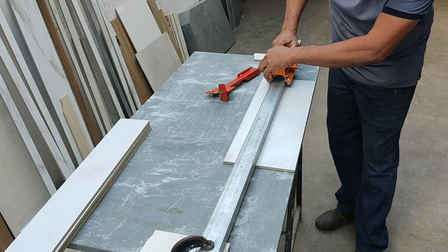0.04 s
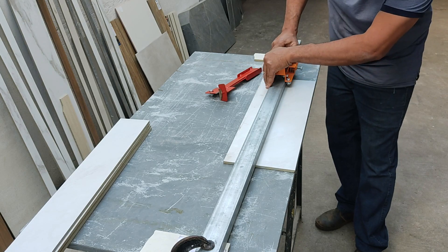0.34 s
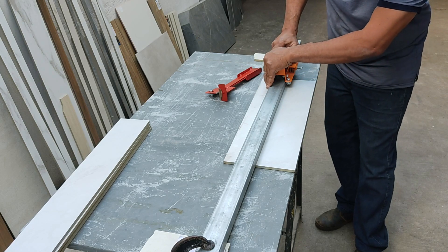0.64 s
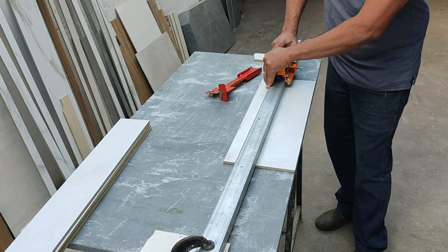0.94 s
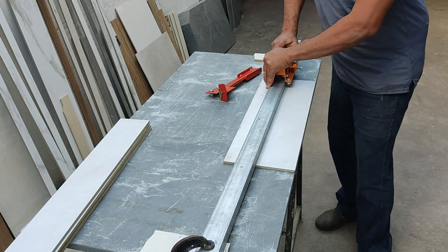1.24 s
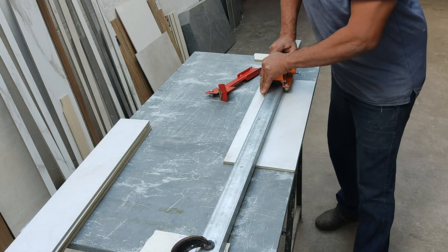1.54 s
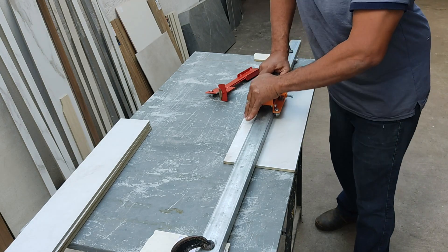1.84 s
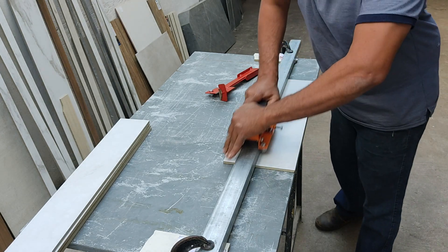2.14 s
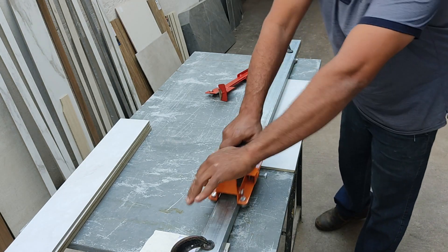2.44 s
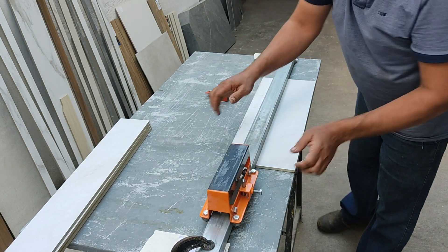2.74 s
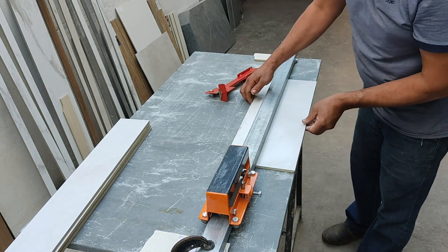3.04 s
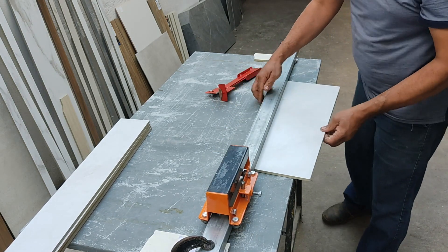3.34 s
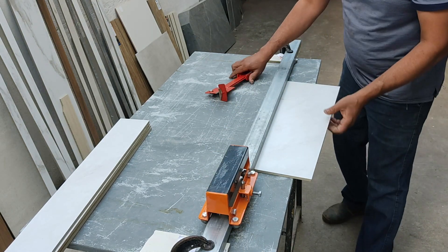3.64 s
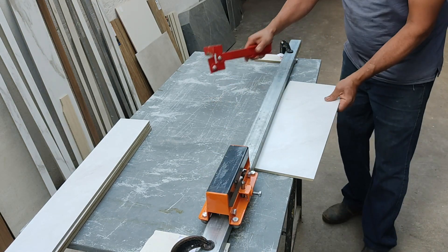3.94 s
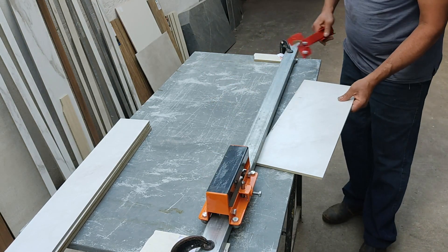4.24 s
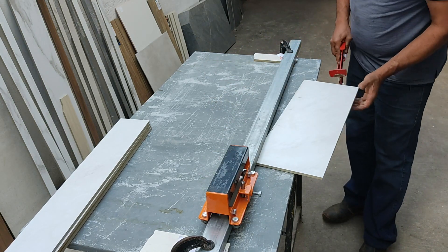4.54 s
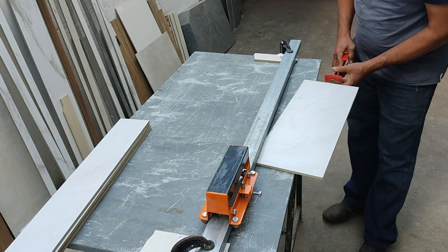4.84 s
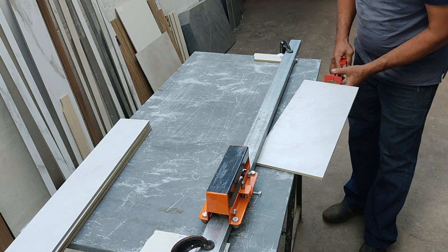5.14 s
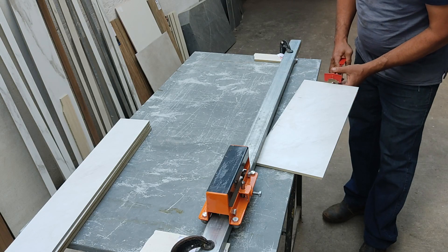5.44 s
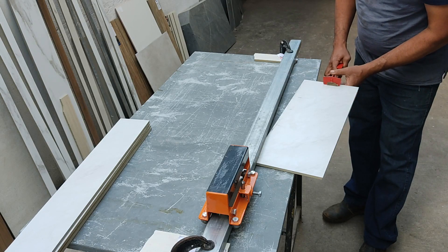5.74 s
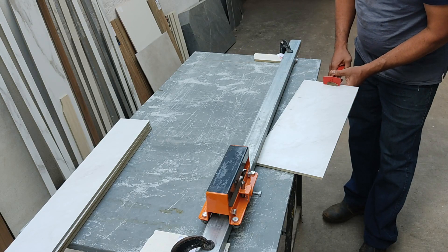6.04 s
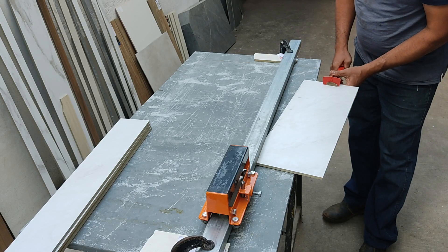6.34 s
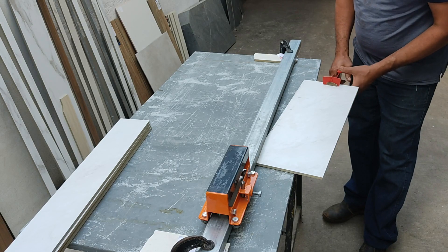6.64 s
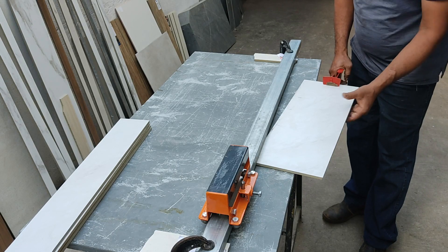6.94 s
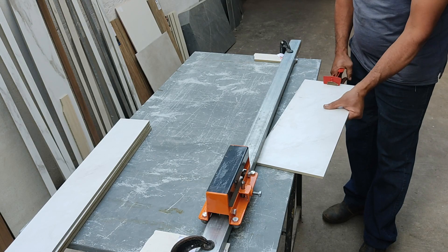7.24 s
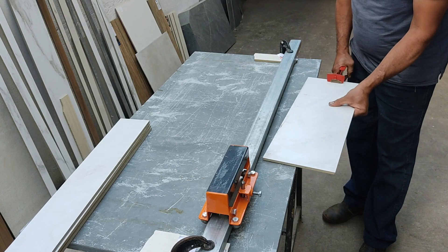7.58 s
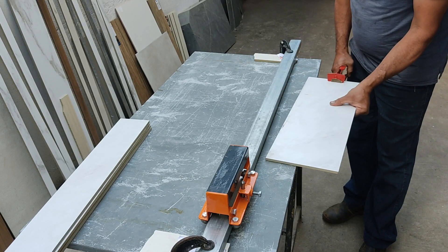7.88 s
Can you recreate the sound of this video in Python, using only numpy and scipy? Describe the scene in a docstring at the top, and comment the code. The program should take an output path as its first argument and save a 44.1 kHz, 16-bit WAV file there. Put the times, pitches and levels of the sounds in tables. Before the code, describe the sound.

A faint, steady rumble and hiss fill a hard-walled workshop, with a barely audible scuff at first. At about 1.4 seconds a cutter's wheel bites into a porcelain tile and scores it in one loud, gritty, high scrape, with crackling chips and brief steel squeals over the carriage rumbling along its rail. At 2.4 the wheel drops off the edge with a sharp knock and the carriage rolls to rest. The tile rubs on the steel bench from 3.1 to 3.6 and again around 4, among light clacks. Pliers jingle softly at 4.8, bite with a hard click at 5.4, and the tile cracks with a ping at 5.7. At 6.6 a strip snaps off with a loud crack and slight thud. Lighter knocks follow until 7.3, then the tile drags briefly until 7.8. Everything sounds fairly close, with a short room echo.

```python
"""In a hard-walled workshop, a porcelain tile is cut on a steel bench.
A carriage rumbles along its rail while its wheel crushes a line into the glaze and the steel sings.
The tile rubs on the bench as it is slid out and turned. Pliers jingle and bite, a strip snaps off,
and the pieces knock and drag. The walls echo the work over a faint, steady rumble and hiss."""
import sys
import numpy as np
from scipy import signal
from scipy.fft import rfft, irfft
from scipy.io import wavfile
from scipy.ndimage import uniform_filter1d

SR = 44100
rng = np.random.default_rng(int(sys.argv[2]) if len(sys.argv) > 2 else 0)


def unload_audio(sound):
    """Save the sound as a 16-bit wav file, at the path given as the first command line argument."""
    columns = np.transpose(np.atleast_2d(sound))
    # keep every value between -1 and 1, then stretch to whole-number steps
    steps = np.round(np.clip(columns, -1, 1) * 32767)
    wavfile.write(sys.argv[1], SR, steps.astype(np.int16))


N = 353241
TIME = np.arange(N) / SR

# Tone colour (how strong each pitch is) of crushed glaze: f/Hz, level/dB
GLAZE_COLOUR = [(2240, -30), (3300, -15), (4300, -19), (5000, -15), (5600, -7), (6500, -3), (7470, 0),
                (8300, -2), (9130, -9), (10000, -21), (13100, -21), (15500, -31)]
# Tone colour of the tile ringing under the wheel: f/Hz, level/dB
PLATE_COLOUR = [(530, -30), (900, -14), (1300, -10), (1700, -2), (2050, 3), (2550, 2.5), (2900, 1),
                (3500, -6), (4300, -14), (5850, -30), (9900, -80)]
# Pitches at which the steel wheel and its holder ring: f/Hz, width/Hz, level/dB
HOLDER_RINGS = [(6430, 47, -4), (7080, 60, -4), (7410, 70, -1), (7680, 54, 0), (8180, 78, -2),
                (8670, 27, -9), (8840, 51, -6), (9260, 34, -12)]
# Large chips break out: t/s, boost/dB
BIG_CHIPS = [(1.512, 2.1), (2.036, 9.6), (2.199, 8.7)]
# The wheel catches and squeals: t/s, rise/s, fall/s, f/Hz, level/dB
SQUEALS = [(1.43, .085, .12, 7400, -18.5), (1.51, 0.06, 0.054, 6340, -25.5), (1.64, .04, 0.055, 7370, -28),
           (2.05, .025, .03, 8190, -27.5), (2.16, .008, .014, 7700, -19.5), (2.194, .008, .02, 7380, -14.5),
           (2.228, .006, .012, 7350, -18)]
# The carriage's run along the rail: t/s, relative speed
CARRIAGE_SPEED = [(1.41, 0.079), (1.55, 0.19), (1.68, 0.47), (1.88, 0.88), (2.37, 0.89), (2.46, 0.56),
                  (2.69, 0.19), (2.77, 0.064), (3.0, 0.0049)]
# Rumble of rail and bench: f/Hz, level/dB
RAIL_COLOUR = [(59, -41.5), (110, -32.5), (155, -14.5), (198, -1.5), (279, -3.5), (308, -4.5), (406, 0),
               (560, -2.5), (630, 0), (722, 0.5), (833, -6.5), (962, -4.5), (1280, -12.5), (1400, -2.5),
               (1820, -43), (3080, -120)]
# Hiss of the bearings: f/Hz, level/dB
BEARING_COLOUR = [(710, -30), (1200, -9), (1800, -2), (2500, -1), (3600, -11), (4800, -15), (6300, -9),
                  (8200, -7), (9200, -16), (10000, -36), (14000, -36)]
# Knocks, clicks and snaps: t/s, body level/dB, crack over body/dB, splinter over body/dB, ring/s
KNOCKS = [(1.348, -57, 20, 26.5, 0.07), (1.412, -62, 24.5, 31, 0.032), (2.376, -21, 1, -36, 0.048),
          (2.715, -47.5, 2, 7, 0.068), (3.004, -68, -5, 10.5, 0.98), (3.773, -40, -9, -13.5, 0.06),
          (3.789, -49.5, -3, -4.5, 0.12), (3.907, -31.5, -9.5, -5, 0.026), (4.353, -34, -2.5, -19, 0.28),
          (4.375, -40, 1.5, 2.5, 0.2), (4.431, -43, -9.5, -14, 0.05), (4.797, -68, 8, 17, 0.2),
          (4.814, -68.5, 17.5, 24.5, 0.2), (5.426, -24, 1, -12.5, 0.14), (5.445, -35.5, -10, -2, 0.06),
          (5.701, -34, 7, 6, 0.19), (5.783, -36, -26, -16, 0.044), (6.447, -48, -11, -8, 0.28),
          (6.6, -39.5, -4, -17, 0.054), (6.61, -31, -28, -18, 0.062), (6.629, -22.5, 2, -0.5, 0.12),
          (6.642, -29, -11, -10, 0.077), (6.654, -38, -1, -8, 0.17), (6.797, -37.5, -0.5, -23, 0.26),
          (7.06, -39, 1, 1.5, 0.17), (7.146, -39, -0.5, -3, 0.11), (7.282, -47, -10, -5, 0.12)]
# Tone colour of a hard blow: f/Hz, level/dB
BLOW_COLOUR = [(29, -51), (50, -21), (120, -19), (180, 2), (235, -1), (300, -3), (380, 1), (480, -2),
               (680, -2), (980, -1), (1350, -7), (2820, -6), (3500, -13), (6060, -16), (7510, -8),
               (9310, -19), (10500, -44), (15000, -56)]
# Bright rings of struck porcelain: f/Hz, width/Hz, level/dB
PORCELAIN_RINGS = [(635, 60, -4), (990, 110, 2), (1280, 50, -2), (1600, 180, 0), (2050, 90, 5),
                   (2240, 100, 5), (2700, 160, 2)]
# Notes of the tile lying on the bench: f/Hz, level/dB, ring before damping/s
TILE_NOTES = [(199, -2, 0.61), (350, -2, 0.48), (484, -2, 0.37), (894, -8, 0.3), (1020, -1, 0.38),
              (1179, -1, 0.47), (1287, -2, 0.3), (1663, -6, 0.48), (1906, -7, 0.66)]
# Notes of the pliers' loose jaws: f/Hz, level/dB, ring before it is capped/s
JAW_NOTES = [(2250, -6, 0.43), (2540, -30, 0.296), (3130, 1, .12), (3740, 6.5, 0.42), (4400, -18, 0.34),
             (5200, -14, 0.28), (5650, -7, 0.28), (6550, 3, .25), (6840, -5, 0.32), (7634, 6.5, .3),
             (8100, 5, .27), (8440, -7, .2)]
# The jaws fall open and touch: t/s, level/dB
JINGLES = [(4.796, -47.5), (4.814, -45), (4.829, -48.5)]
# Notes of the narrow strip: f/Hz, level/dB, ring before it is capped/s
STRIP_NOTES = [(2204, 1.5, 0.092), (2700, 2.5, 0.17), (2850, 1, 0.12), (3180, 0, 0.06), (4430, -6, .1),
               (4920, -18, 0.1), (6450, -9.5, 0.13), (7260, -15, 0.092), (8010, -3, .14), (8963, -13, .09)]
# The carriage scuffs the tile; then the tile is pulled out, swung round, seated and dragged away:
# t/s, rise/s, hold/s, fall/s, level/dB, then relative drone/dB, grit/dB, ring/dB
SLIDES = [(0.26, 0.017, 0.13, 0.12, -69.5, 4, 8, -21), (0.48, 0.13, 0.06, 0.13, -70, 9.5, 0, -31),
          (3.1, 0.23, 0.057, 0.18, -28.5, -12, -5.5, -5), (3.92, 0.046, 0.02, 0.042, -43.5, -8, -10, -17),
          (3.968, 0.15, 0.0079, 0.21, -28.5, -11.5, -6.5, -5.5),
          (5.131, 0.095, 0.11, 0.12, -74.5, 14.5, -15, -26),
          (6.14, 0.071, 0.18, 0.28, -64.5, -4.5, -10.5, -11),
          (7.28, 0.0042, 0.018, 0.055, -43.5, -10, -4, 2), (7.29, 0.12, 0.28, 0.091, -41, -1, -9, -0.5)]
# Tone colour of porcelain rubbing on the bench: f/Hz, level/dB
RUB_COLOUR = [(65, -55), (110, -24), (170, -7), (350, -6), (520, -7.5), (700, -4.5), (1100, -3),
              (1550, -2.5), (2200, -3), (2900, -6), (4300, -14), (6000, -13), (7800, -8.5), (9300, -18),
              (10500, -32), (15000, -44)]
# Rings of the bench and the dragged tile: f/Hz, width/Hz, level/dB
RUB_RINGS = [(362, 40, 0), (620, 90, -5), (950, 50, -2), (1060, 70, -1), (1490, 140, -4), (2170, 130, 0),
             (2740, 180, -5)]
# The heaviest blows shake the bench: t/s, level/dB
THUMPS = [(2.376, -53), (6.63, -50)]
# Tone colour of the still air: f/Hz, level/dB
AIR_COLOUR = [(13, -13), (22, -8), (54, -19), (97, -23), (124, -21), (243, -21.5), (644, -30), (737, -27.5),
              (867, -34), (4270, -47.5), (7940, -41.5), (12200, -70.5), (14000, -69.5)]
# How long the room echoes: f/Hz, time to fade by 60 dB/s
ROOM_ECHO = [(130, 1), (400, 0.73), (1000, 0.77), (2500, 0.73), (5000, 0.77), (9000, 0.51), (15000, 0.22)]
# Balance between the two sides: f/Hz, left minus right/dB
BALANCE = [(50, 7.5), (200, 5.5), (500, 3), (1000, 4), (2200, 0.7), (5000, -1), (9000, -2.5)]

STROKE_S, EDGE_S = 1.412, 2.385  # the wheel starts to cut; it runs off the far edge
PRESS_S, CRUSH_DB = 0.12, -21.5  # time to reach full pressure; base level of the crushing
SPREAD_S = 0.0029  # a blow takes this long to spread through the tile


def scoring(bite_s=0.01, lift_s=0.099, light_touch_db=-11, chip_s=0.004, rasp_fade_db_per_s=21):
    """The wheel crushes the glaze in uneven spurts; each chip rings the tile and the steel holder."""
    touching = ramp(STROKE_S, bite_s) * (1 - ramp(EDGE_S - lift_s / 2, lift_s))
    crush_db = CRUSH_DB + light_touch_db * (1 - ramp(STROKE_S, PRESS_S))
    crush_db += sum(db * (TIME > s) * np.exp(-np.abs(TIME - s) / chip_s) for s, db in BIG_CHIPS)
    plate_db = -4 + 5.5 * np.exp(-np.abs(EDGE_S - TIME) / 0.15)  # the tile rings more near its free edge
    plate_db += 2 * (1 - ramp(STROKE_S, 0.3))
    spurts = amp(wander(130, 2.6) + wander(30, 1.2))
    chips = shifting(grains(per_s=3500, spread_db=3.5) * spurts, depth_db=5)
    glaze = unit(colour(chips, GLAZE_COLOUR)) * amp(crush_db - 1.5)
    plate = unit(colour(chips, PLATE_COLOUR)) * amp(crush_db + plate_db)
    # Fresh glaze rasps at the start of the stroke.
    rasp = unit(band(grains(per_s=2000, spread_db=5) * spurts ** 2, 3000, 6600))
    rasp *= amp(crush_db - 11 - rasp_fade_db_per_s * np.maximum(TIME - STROKE_S, 0))
    # As the grip and the wheel's angle change, the holder's rings take turns.
    rings = sum(amp(db + wander(14, 6)) * resonate(resonate(chips, hz, width), hz, 3 * width)
                for hz, width, db in HOLDER_RINGS)
    steel = unit(rings) * amp(crush_db - 4.5)
    crushing = glaze + rasp + crackle() * amp(crush_db)
    return (pan(crushing, -0.3) + pan(steel + squeal(), -3.3) + pan(plate, -.5)) * touching


def squeal():
    """Now and then rubbing drives one ring of the holder into a brief, unsteady tone."""
    waver_hz, flutter = 25 * walk(200), amp(wander(110, 4))
    out = np.zeros(N)
    for start_s, rise_s, fall_s, hz, db in SQUEALS:
        swell = gesture(start_s, rise_s, 0, fall_s)
        on = swell > 0
        tone = np.sin(2 * np.pi * np.cumsum(hz + waver_hz[on]) / SR)
        out[on] += unit(tone * flutter[on]) * swell[on] * amp(db)
    return out


def crackle(per_s=70):
    """Single flakes of glaze pop off, sharp above the steady crushing."""
    flakes = (rng.random(N) < per_s / SR) * rng.choice([-1, 1], N)
    sizes = amp(3 * np.clip(rng.standard_normal(N), -2, 1))
    return unit(band(flakes * sizes, 3600, 9000, order=2)) * amp(-5.5)


def tinkle(per_s=200, range_hz=(5300, 9100), ring_s=.045):
    """Each splinter of glaze rings briefly on a pitch of its own."""
    t, out = TIME[:int(ring_s * SR)], np.zeros(N)
    cut_s = EDGE_S - STROKE_S
    for when, pitch, size in rng.random((int(per_s * cut_s), 3)):
        start = int((STROKE_S + when * cut_s) * SR)
        hz = np.interp(pitch, [0, 1], range_hz)
        ring = np.sin(2 * np.pi * hz * t) * fade(t, ring_s) * (1 - np.exp(-t / SPREAD_S))
        out[start:start + len(t)] += ring * size ** 2 * amp(along(GLAZE_COLOUR, hz) / 2)
    return out / np.std(out[out != 0]) * ramp(STROKE_S, PRESS_S) * amp(CRUSH_DB - 3.5)


def rolling():
    """The carriage is pushed along; it hisses less past the tile's edge, and the bench booms at the end."""
    speed = np.interp(TIME, *np.transpose(CARRIAGE_SPEED), left=0, right=0)
    boom = unit(band(grains(per_s=3000, spread_db=3), 120, 210, order=2))
    boom *= gesture(2.11, 0.26, 0.18, 0.36) * amp(-44.5)
    return carriage(speed, hiss_db=np.where(TIME < EDGE_S, 0.5, -1.5)) + boom


def carriage(speed, hiss_db):
    """Bearings roll over dust: they hiss and shake the rail and bench, louder the faster they go."""
    bumps = grains(per_s=3000, spread_db=4.5) * amp(wander(35, 2))
    rumble = unit(colour(bumps, RAIL_COLOUR))
    hiss = unit(colour(bumps, BEARING_COLOUR)) * amp(hiss_db)
    return pan((rumble + hiss) * speed * amp(-26), .2)


def knocks():
    """The wheel bites and drops off the edge, the pliers clack, the strip snaps and the pieces touch."""
    out = np.zeros((2, N + SR))
    for s, body_db, crack_db, splinter_db, ring_s in KNOCKS:
        thud_db = -14 + 0.73 * body_db  # the heavy bench thuds under every blow
        blow = knock([thud_db, body_db, body_db + crack_db, body_db + splinter_db], ring_s)
        start = int(s * SR)
        out[:, start:start + blow.shape[1]] += blow
    return pan(out[:, :N], -1.16)


def knock(levels_db, ring_s, crack_s=0.0089, damping=0.45):
    """One blow: a crack, a dense ring from all over the tile, and the notes of the tile on the bench."""
    t = TIME[:SR // 2]
    chatter = diffuse(len(t)) * (fade(t, ring_s) + amp(1) * np.exp(-t / crack_s))
    contact = np.array([colour(even(side, width_hz=120), BLOW_COLOUR) for side in chatter])
    clink = sum(amp(db) * resonate(contact, hz, width) for hz, width, db in PORCELAIN_RINGS)
    notes = 0
    for hz, db, note_s in TILE_NOTES:
        sign, detune = rng.choice([-1, 1]), 1 + 0.0075 * rng.standard_normal()
        notes += amp(db) * sign * np.sin(2 * np.pi * hz * detune * t) * fade(t, damping * note_s)
    blow = (unit(contact) + unit(clink) + amp(-8) * unit(notes)) * (1 - np.exp(-t / SPREAD_S))
    # Where and how hard the blow lands decides how loud its low and high parts are.
    parts = split(blow, edges_hz=[500, 1500, 4200])
    return sum(amp(db) * part / np.std(part[:, t < .03]) for part, db in zip(parts, levels_db))


def clinks():
    """The jaws of the pliers jingle open; later the strip pings as it cracks."""
    jaws = sum(chime(JAW_NOTES, s, db) for s, db in JINGLES)
    ping = chime(STRIP_NOTES, start_s=5.7025, level_db=-22)
    return pan(jaws, -1.8) + pan(ping, -0.51)


def chime(notes, start_s, level_db, count=4, spread_hz=75, longest_s=.14):
    """A small, hard, hand-held thing is struck: a scrape, and close pitches that wobble and soon die."""
    t, start, out = TIME[:SR // 2], int(start_s * SR), np.zeros(N)
    ring = 0
    for hz, db, ring_s in notes:
        detune, phase = rng.standard_normal((2, count, 1))
        cluster = np.sin(2 * np.pi * ((hz + spread_hz * detune) * t + phase)).sum(0)
        ring += amp(db) * unit(cluster) * fade(t, min(ring_s, longest_s))
    scrape = unit(band(rng.standard_normal(len(t)), 2300, 8400, order=6)) * fade(t, longest_s)
    strike = (unit(ring) + amp(-3) * unit(scrape)) * ramp(0, .002)[:len(t)]
    out[start:start + len(t)] = strike / np.std(strike[t < .03]) * amp(level_db)
    return out


def slides(snags_per_s=110):
    """Grit catches as the tile is scuffed or moved, and sets the tile and bench ringing."""
    catches = grains(per_s=9000, spread_db=2.2) * amp(wander(60, 1.2))
    snags = unit((rng.random(N) < snags_per_s / SR) * rng.uniform(-0.63, 1, N)) * amp(-7)
    friction = colour(shifting(catches, depth_db=4.5) + snags, RUB_COLOUR)
    rings = sum(amp(db + wander(11, 11)) * resonate(friction, hz, width) for hz, width, db in RUB_RINGS)
    out = np.zeros(N)
    for *timing, level_db, drone_db, grit_db, ring_db in SLIDES:
        speed = gesture(*timing)
        moving = speed > 0
        tile = unit(friction[moving]) + amp(ring_db) * unit(rings[moving])
        drone, rubbing, grit = (unit(part) for part in split(tile, edges_hz=[520, 4200]))
        drag = rubbing + drone * amp(drone_db) + grit * amp(grit_db)
        out[moving] += drag * speed[moving] * amp(level_db)
    return pan(out, -0.7)


def shifting(x, depth_db):
    """A moving contact passes lively and dead spots of the tile, so its pitches swell and fade in turn."""
    cells = signal.stft(x, SR, nperseg=512)[2]
    swell = uniform_filter1d(rng.standard_normal(cells.shape), size=2, axis=0)  # smooth over pitch
    swell = uniform_filter1d(swell, size=14, axis=1)  # and over time
    return signal.istft(cells * amp(depth_db * np.tanh(unit(swell))), SR)[1][:N]


def thumps(shake_s=0.28):
    """The frame of the bench shudders under the heaviest blows."""
    shake = sum(amp(db) * ramp(s, .004) * fade(np.abs(TIME - s), shake_s) for s, db in THUMPS)
    return unit(band(rng.standard_normal(N), 48, 125, order=2)) * shake


def travelling(x, early_db, tail_db, count=8):
    """The carriage moves down the bench, so each stretch of its path has its own echoes."""
    stops_s = np.linspace(STROKE_S, EDGE_S + .2, count)
    out = np.zeros((2, N))
    for s, share in zip(stops_s, np.eye(count)):
        heard = slice(int((s - stops_s[1] + stops_s[0]) * SR), int((s + 1) * SR))
        blend = np.sqrt(np.interp(TIME[heard], stops_s, share))
        out[:, heard] += workshop(x[:, heard] * blend, early_db, tail_db)
    return out


def workshop(x, early_db, tail_db, early_s=0.0079, build_s=0.0011):
    """The direct sound, quick echoes off the bench and stacked slabs, then the room's fading tail."""
    t = TIME[:SR]
    hz, frame_s, cells = signal.stft(diffuse(SR), SR, nperseg=256)
    tail = signal.istft(cells * fade(frame_s, along(ROOM_ECHO, hz)[:, None]), SR)[1][:, :SR]
    tail = unit(tail * (1 - np.exp(-t / build_s))) * amp(tail_db)
    early = unit(diffuse(SR) * np.exp(-t / early_s) * (t > .001)) * amp(early_db)
    early = band(early, 400, 18000, order=1)  # the quick echoes carry little bass
    paths = (t == 0) + (early + tail) / np.sqrt(SR)
    response = np.array([unit(even(side)) for side in paths]) / np.sqrt(SR)
    return signal.oaconvolve(x, response, axes=1)[:, :x.shape[1]]


def air():
    """A faint, steady rumble and hiss."""
    return unit(np.array([colour(side, AIR_COLOUR) for side in diffuse(N, apart_hz=60.5)])) * amp(-59)


def diffuse(size, apart_hz=900):
    """Noise from all around: left and right are alike in the bass and unrelated in the treble."""
    hz = np.fft.rfftfreq(size, 1 / SR)
    alike = 1 / (1 + (hz / apart_hz) ** 2)
    mid, side = rfft(rng.standard_normal((2, size))) * np.sqrt([1 + alike, 1 - alike]) / np.sqrt(2)
    return irfft([mid + side, mid - side], size)


def grains(per_s, spread_db):
    """Tiny clicks at random moments, a few much larger than the rest."""
    hit = rng.random(N) < per_s / SR
    size_db = np.minimum(spread_db * rng.exponential(size=N), 13)
    return unit(hit * rng.choice([-1, 1], N) * amp(size_db))


def walk(per_s):
    """A random drift of size about 1 that turns per_s times a second."""
    return unit(np.interp(TIME * per_s, np.arange(4096), rng.standard_normal(4096)))


def wander(per_s, limit_db):
    """A level that drifts up and down by at most limit_db."""
    return limit_db * np.tanh(walk(per_s))


def ramp(start_s, length_s):
    """A smooth step from 0 to 1."""
    return np.sin(np.pi / 2 * np.clip((TIME - start_s) / length_s, 0, 1)) ** 2


def gesture(start_s, rise_s, hold_s, fall_s):
    """Rise, hold and fall back to rest, like a move of the hand."""
    return ramp(start_s, rise_s) * (1 - ramp(start_s + rise_s + hold_s, fall_s))


def fade(t, ring_s):
    """Die away by 60 dB in ring_s seconds."""
    return np.exp(-np.log(1000) * t / ring_s)


def colour(x, points, size=4096):
    """Give a sound the tone colour in points (f/Hz, level/dB)."""
    cepstrum = irfft(np.log(amp(along(points, np.fft.rfftfreq(size, 1 / SR)))))
    # Fold the filter so it rings only after a sound, never before.
    cepstrum[1:size // 2] *= 2
    cepstrum[size // 2 + 1:] = 0
    return signal.oaconvolve(x, irfft(np.exp(rfft(cepstrum))))[:len(x)]


def even(x, width_hz=70):
    """Level out the broad peaks and dips of a tone colour, keeping its fine detail."""
    hz = np.fft.rfftfreq(len(x), 1 / SR)[1:]
    power = uniform_filter1d(np.abs(rfft(x))[1:] ** 2, max(int(width_hz / hz[0]), 1))
    return colour(x, np.column_stack([hz, -10 * np.log10(power / power.mean() + 1e-3)]))


def split(x, edges_hz):
    """Split a sound into parts, low to high, that add up to it again."""
    filters = [signal.butter(3, hz, fs=SR, output="sos") for hz in edges_hz]
    below = [signal.sosfiltfilt(sos, x, padtype=None) for sos in filters]
    return np.diff([0 * x, *below, x], axis=0)


def band(x, lo_hz, hi_hz, order=3):
    """Keep the pitches between two limits."""
    return signal.sosfilt(signal.butter(order, [lo_hz, hi_hz], "band", fs=SR, output="sos"), x)


def resonate(x, hz, width_hz):
    """Ring at one pitch; the narrower the width, the longer the ring."""
    return signal.lfilter(*signal.iirpeak(hz, hz / width_hz, fs=SR), x)


def along(points, hz):
    """Read between a table's rows (f/Hz, value), with octaves evenly spaced."""
    f, value = np.transpose(points)
    return np.interp(np.log(np.maximum(hz, 1)), np.log(f), value)


def pan(x, db):
    """Make the left side db louder than the right."""
    return x * amp(np.array([[db], [-db]]) / 2)


def amp(db):
    """Turn decibels into a multiplier."""
    return 10 ** (np.asarray(db) / 20)


def unit(x):
    """Scale to an average strength (rms) of 1."""
    return x / np.sqrt(np.mean(x ** 2) + 1e-20)


def scene():
    """All the work at the bench; each spot on it has its own echoes."""
    nudge = carriage(0.018 * gesture(0.21, 0.061, 0.47, 0.1), hiss_db=-3)  # eased into place
    handling = workshop(nudge + slides(), early_db=6.5, tail_db=2)
    cut = travelling(scoring() + rolling(), early_db=8.5, tail_db=4.5)
    blows = workshop(knocks(), early_db=-9, tail_db=-5) + workshop(clinks(), early_db=3, tail_db=-5)
    splinters = workshop(np.array([tinkle(), tinkle()]), early_db=-6, tail_db=-5)
    return cut + splinters + handling + blows + thumps() + air()


def record(dry, top_hz=15700):
    """Low sounds lean left, high ones slightly right, and the highest treble is cut."""
    sides = np.array([colour(side, [(hz, sign * db / 2) for hz, db in BALANCE])
                      for side, sign in zip(dry, (1, -1))])
    return signal.sosfilt(signal.ellip(10, .2, 80, top_hz, fs=SR, output="sos"), sides)


dry = scene()
out = record(dry)
unload_audio(out)
```